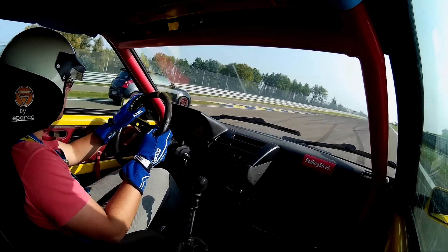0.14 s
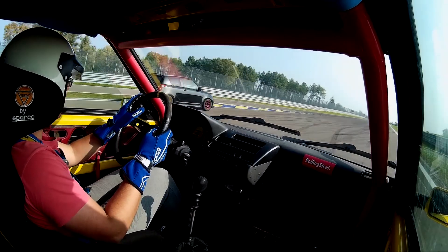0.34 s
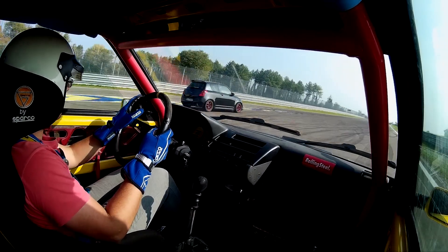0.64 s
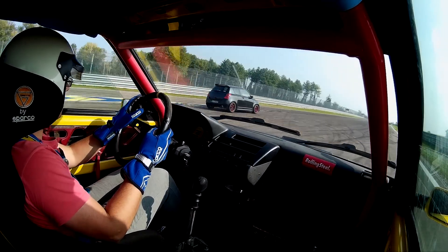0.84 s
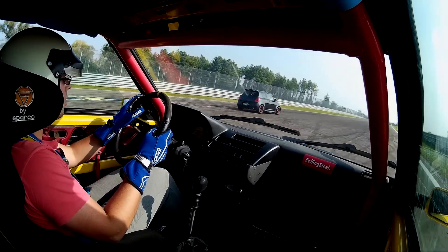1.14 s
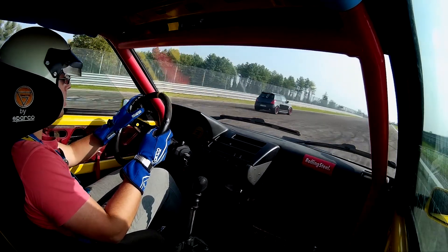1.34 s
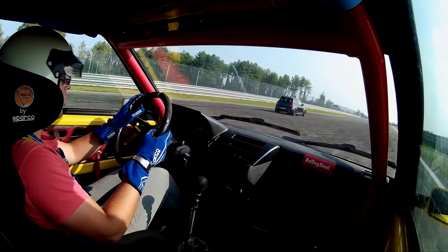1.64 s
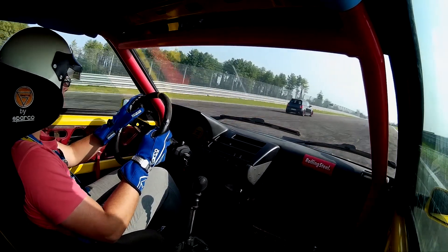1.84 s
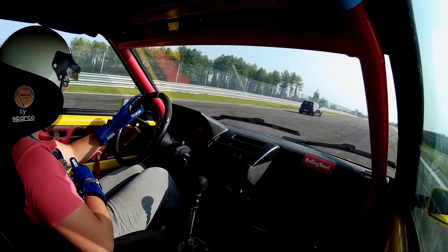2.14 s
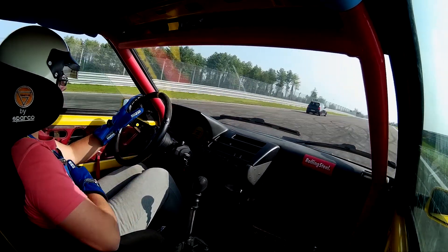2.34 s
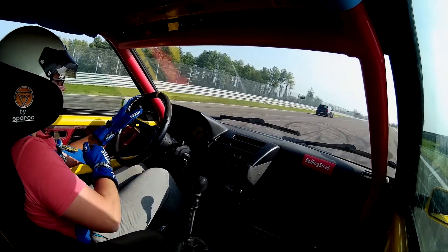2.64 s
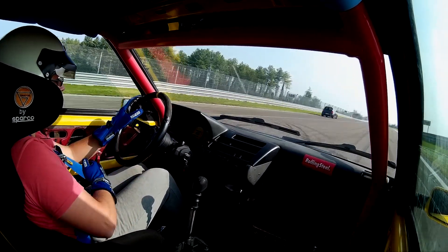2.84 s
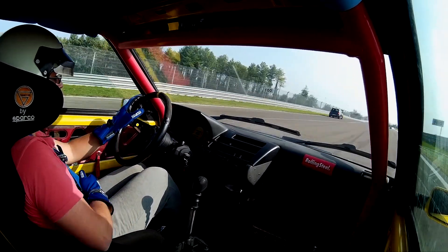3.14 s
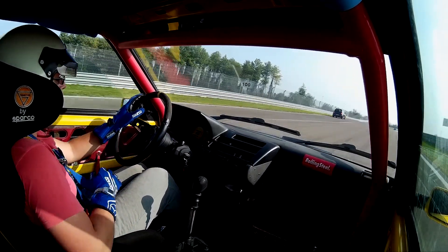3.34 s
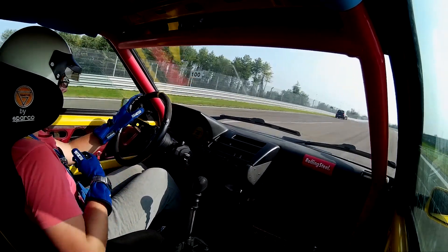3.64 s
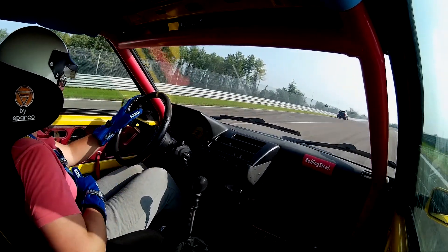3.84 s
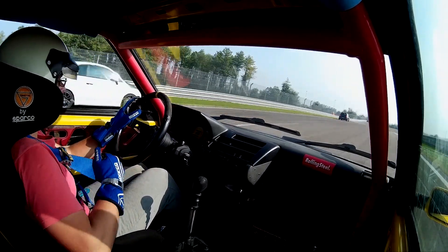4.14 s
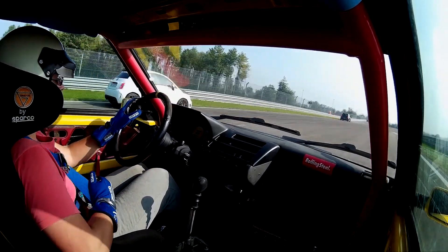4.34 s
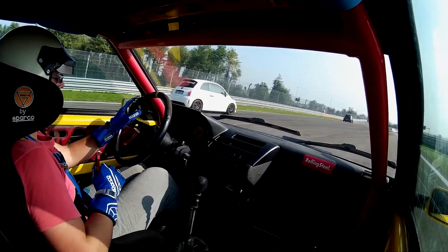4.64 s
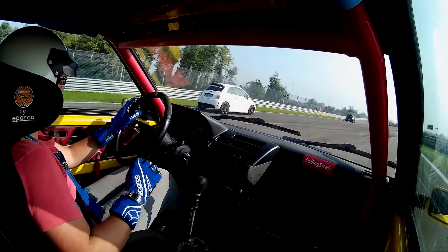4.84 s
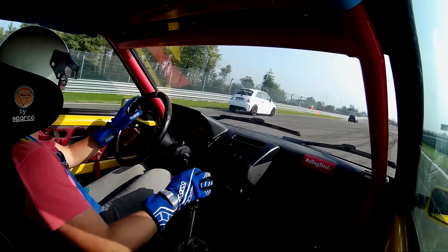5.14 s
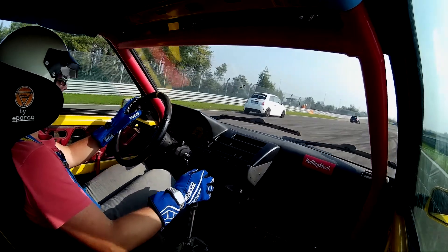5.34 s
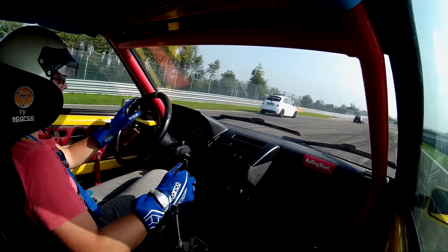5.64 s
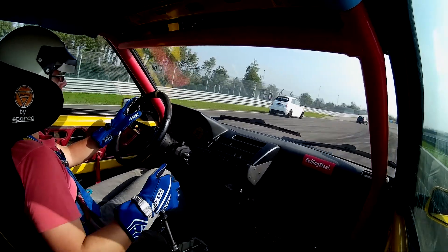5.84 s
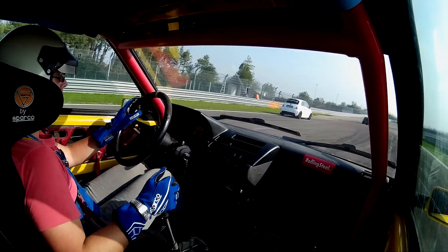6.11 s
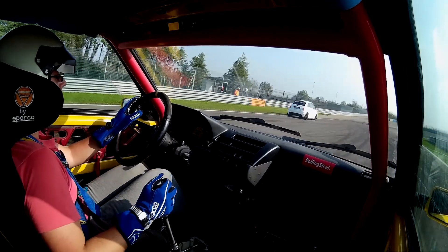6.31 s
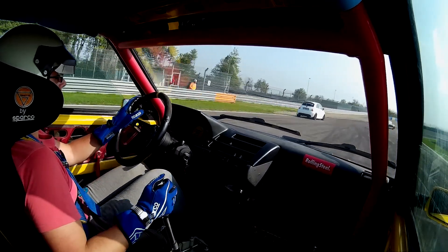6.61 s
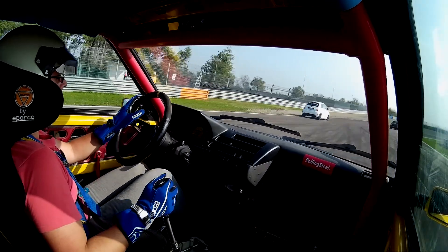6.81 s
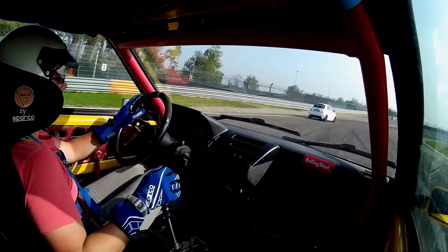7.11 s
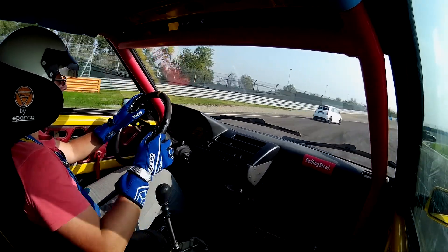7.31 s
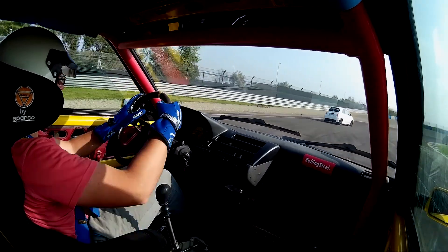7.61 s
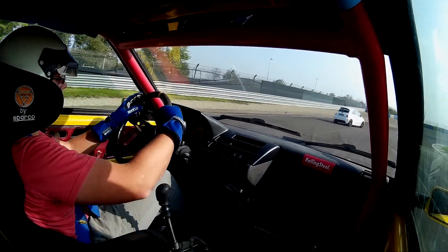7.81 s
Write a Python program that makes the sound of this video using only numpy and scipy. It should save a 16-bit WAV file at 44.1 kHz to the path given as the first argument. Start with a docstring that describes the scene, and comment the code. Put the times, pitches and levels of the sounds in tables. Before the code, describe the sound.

Close inside a bare metal race car cabin, a four-cylinder engine booms low and slowly drops in pitch over tyre roar and shell rumble. A higher-pitched car ahead fades away; around four seconds another rushes by with falling pitch. Revs then sag with harsh rasp, metallic rattles and tiny brake chirps, before a throttle blip climbs sharply and settles into a throbbing boom.

```python
"""Downshift inside a stripped race car

A four-cylinder race car pulls, coasts, brakes and blips down a gear, while one car pulls away and a second overtakes.
The exhaust is a harmonic series weighted by the bare cabin's modes, with a rasp of gas noise pulsed by the firings.
Filtered noise gives the roar of tyres and shell, sinking as the car slows; a loose fitting is struck at the firings.
Brake chirps are decaying sines; the other cars are harmonic sums; those of the car pulling away fade independently."""
import sys
import numpy as np
from scipy import signal
from scipy.fft import rfft, irfft
from scipy.io import wavfile
from scipy.ndimage import uniform_filter1d

SR = 44100
rng = np.random.default_rng(int(sys.argv[2]) if len(sys.argv) > 2 else 0)


def log_audio(samples):
    """Write samples as a 16-bit WAV file to the path given in sys.argv[1]."""
    # one column per channel
    frames = np.atleast_2d(samples).T
    # limit to full scale, then quantise
    limited = np.clip(frames, -1, 1)
    pcm = np.round(limited * 32767).astype(np.int16)
    wavfile.write(sys.argv[1], SR, pcm)


N = 351536
T = np.arange(N) / SR  # time [s]

# engine speed, coasting and then through the downshift: (time [s], firing rate [1/s])
ENGINE_SPEED = [(0.0, 129.3), (1.75, 122.4), (3.39, 114.8), (4.09, 108.7), (5.25, 99.5), (5.5, 97.0),
                (5.57, 94.5), (6.03, 68.0), (6.17, 62.9), (6.74, 87.5), (6.85, 98.1), (6.94, 113.6),
                (7.01, 112.1), (7.14, 103.2), (7.25, 108.3), (7.34, 103.4), (7.97, 96.5)]
# upper harmonics of the exhaust: (multiple of the firing rate [1], relative level [dB])
EXHAUST_HARMONICS = [(3, 3), (4, -5.5), (5, -7.5), (6, -12.5), (7, -9), (8, -19), (9, -13.5), (10, -28.5),
                     (11, -22.5), (13, -18)]
# cabin's effect on the upper harmonics: (frequency [Hz], lift [dB])
CABIN_RESPONSE = [(190, 2), (295, -4), (345, 0.7), (400, -2.5), (510, 1.5), (620, -1), (760, 0.5), (880, 6),
                  (1300, -5.5)]
# low air modes of the cabin: (frequency [Hz], width [Hz], boom level [dB])
CABIN_MODES = [(64, 10, -26), (85.7, 5.8, -18), (101.2, 12, -17), (112.1, 12, -16.5), (127, 11.5, -9),
               (137, 25, -11.5), (166, 10, -16.5), (196, 19, -20.5), (238, 42, -19.5)]
# surges of engine load: (peak time [s], rise [s], fall [s],
#   lift of rasp [dB], lift of cabin roar [dB], lift of upper harmonics [dB])
LOAD_SURGES = [(.4, 1.6, 1.0, 11, 0, 4.5), (5.97, 0.78, 0.28, 22.5, 8.6, 4),
               (6.86, 0.46, 0.12, 20.5, 9, 4.5), (7.951, 0.14, .3, 11, 3.3, 1)]
# spectrum of the exhaust rasp: (frequency [Hz], relative density [dB per Hz])
RASP_SPECTRUM = [(120, -37), (280, 1), (450, -13), (900, -14), (1300, -23), (2000, -29.5), (3000, -42),
                 (4500, -51), (7000, -62.5), (15000, -70.5)]
# spectrum of the shell shaking: (frequency [Hz], relative density [dB per Hz])
SHELL_SPECTRUM = [(8, -16), (20, -2), (31, -1), (39, 2), (50, -1), (62, -4), (85, -11), (200, -40),
                  (800, -100)]
# spectrum of the droning floor pan: (frequency [Hz], relative density [dB per Hz])
FLOOR_SPECTRUM = [(50, -21), (90, -5.5), (130, 3), (200, -1.5), (270, -5), (370, -2), (600, -24.5),
                  (2000, -100)]
# spectrum of the roar: (frequency [Hz], relative density [dB per Hz])
ROAR_SPECTRUM = [(300, -31.5), (480, 0.5), (700, -8), (1000, -3.5), (1400, -12), (2000, -23), (2600, -30.5),
                 (3300, -39.5), (3950, -39), (4700, -44.5), (6700, -50.5), (8100, -50.5), (9500, -54),
                 (15000, -57)]
# rough patches of track that shake the shell: (time [s], half length [s], lift [dB])
ROUGH_PATCHES = [(.1, 0.17, 3.5), (1.699, .8, 3), (4.9, .45, 4.5), (6.62, 0.17, 6.5)]
# fits of rattling: (start [s], end [s], rise [s], relative force [dB])
RATTLE_FITS = [(0, .68, 0.018, -66.5), (5.206, 5.354, .08, -63), (5.349, 5.627, 0.012, -49),
               (5.685, 5.739, 0.017, -43.5), (5.745, 6.008, .11, -42), (6.604, 6.698, 0.013, -44),
               (7.68, 7.97, .12, -62.5)]
# single knocks of the fitting: (time [s], relative blow [dB])
FITTING_KNOCKS = [(.347, -26), (.51, -27), (.627, -29), (.669, -25), (1.177, -26), (3.225, -31),
                  (6.328, -32.5)]
# spectrum of the rattling fitting: (frequency [Hz], relative density [dB per Hz])
FITTING_SPECTRUM = [(300, -38), (800, -8), (1300, -1), (2100, -.3), (3300, -11), (3950, -6), (4450, -1.5),
                    (5200, -15), (7800, -20), (9800, -25), (11700, -25.5), (12600, -34), (15000, -39)]
# the car pulling away ahead: (time [s], firing rate [1/s], relative level [dB])
LEADER_COURSE = [(0, 202, -27), (.3, 202.8, -26), (.7, 204, -28), (1.2, 205.8, -30), (2, 208, -33),
                 (3, 212, -41), (3.6, 214, -60)]
# its harmonics: (multiple of the firing rate [1], relative level [dB])
LEADER_HARMONICS = [(1, -4), (2, 0.6), (3, -4.5), (4, -12.5), (5, -5.5), (6, -11.5), (7, -16), (8, -19),
                    (9, -22), (10, -28), (11, -31), (12, -32.5), (14, -36.5)]
# flares of the harmonic nearest a frequency: (time [s], frequency [Hz], lift [dB], half length [s])
LEADER_FLARES = [(.4, 406, 3, .3), (.3, 1420, 8, .13), (.73, 1225, 12, .15), (1.2, 1645, 9, .3),
                 (1.35, 617, 4, .25)]
# faint metallic whirrs, silent if the end precedes the start:
#   (start [s], end [s], frequency [Hz], width [Hz], level [dB])
METAL_WHIRRS = [(0.7, .9, 3000, 330, -65.5), (8.5, 8.2, 4560, 650, -64), (1.7, 3.7, 4020, 420, -68.5),
                (3.5, 5.21, 3790, 460, -63), (3.5, 5.8, 3060, 530, -64.5), (1.4, 3.7, 8100, 600, -79.5)]
# the overtaking car, its pitch dropping as it passes: (time [s], firing rate [1/s], relative level [dB])
PASSER_COURSE = [(3.3, 197, -46), (3.45, 196, -27), (4.25, 156, -25.5), (4.42, 138, -20.5),
                 (4.68, 145, -25.5), (5.3, 130, -34.5), (5.9, 130, -30), (6.5, 129.5, -22),
                 (6.78, 124, -26.5), (7.1, 130, -55)]
# its harmonics: (multiple of the firing rate [1], relative level [dB])
PASSER_HARMONICS = [(1, 0), (2, -16), (3, -23), (4, -24), (5, -32.5), (6, -25)]
# spectrum of its rush beside the window: (frequency [Hz], relative density [dB per Hz])
RUSH_SPECTRUM = [(100, -20), (300, -5.5), (700, -7.5), (1300, -12.5), (2200, -18), (3500, -32),
                 (8000, -50.5), (14000, -81.5)]
# swells of the drivetrain hum off the throttle: (time [s], half length [s], level [dB])
SHAFT_SWELLS = [(3.695, 0.12, -25.5), (4.255, 0.21, -22), (4.921, .27, -26.5)]
# brake chirps: (time [s], frequency [Hz], peak level [dB], rise [s], decay time constant [s])
BRAKE_CHIRPS = [(5.591, 9500, -45, .008, .012), (5.977, 7714, -35.5, 0.0045, 0.02),
                (6.001, 7720, -42, 0.011, 0.021), (6.03, 7760, -41, 0.019, .012),
                (6.047, 6578, -45, .02, .014), (6.995, 6400, -58, .008, 0.0088)]
# spectrum of the engine block's ring: (frequency [Hz], relative density [dB per Hz])
BLOCK_SPECTRUM = [(400, -34.5), (1400, 9), (2500, 4), (3300, -11.5), (5000, -22), (9000, -35.5),
                  (15000, -45.5)]

SECOND_DB = -5.5  # offset of the second harmonic's boom
UPPER_DB, UPPER_DB_PER_S = -35.5, 0.87  # the upper harmonics come forward with time
SURGE_CURVE = .85  # under 1: the load comes in early and holds
BITE_S, BITE_LENGTH_S, BITE_DB = 6.9, 0.038, 7.5  # the clutch bites in the lower gear and the boom jumps
THROB_HZ, THROB_DB, THROB_CREST_S = 9, 2.5, 7.43  # the boom also throbs steadily from then on
RASP_DB = -48  # off the throttle
DRONE_DB, ROAR_DB, ROAR_DB_PER_S = -26, -32, -0.66  # drone and roar sink as the car slows
RUMBLE_DB, RUMBLE_DB_PER_S = -25, -1.03  # and so does the shaking of the shell
RATTLE_RELEASE_S = 0.0087  # time constant
BUZZ_DB = -85.5  # relative force between fits, off the throttle
RAP_START_S, RAP_RISE_S, RAP_DB = 6.33, .07, -57  # combustion raps once the engine picks up again
LUG_S, LUG_LENGTH_S, LUG_DB = 6.58, 0.13, 13  # hardest while it pulls up from low revs
EDGE_HZ = 15900  # upper band limit


def gain_of(db):
    """Logarithmic level: decibels become an amplitude ratio."""
    return 10 ** (np.asarray(db) / 20)


def evened(x):
    """Power normalization: the signal is scaled to rms 1."""
    return x / np.sqrt(np.mean(x ** 2) + 1e-20)


def curves(rows):
    """Linear interpolation: every column of a table becomes a course in time."""
    s, *columns = np.transpose(rows)
    return [np.interp(T, s, column) for column in columns]


def swell(s, length):
    """Gaussian envelope: a bell of height 1 around the time s."""
    return np.exp(-((T - s) / length) ** 2)


def wander(hz, size=2048):
    """Low-passed random process: slow variation with changes up to about hz."""
    f = np.fft.rfftfreq(size, N / SR / size)
    spectrum = rfft(rng.standard_normal(size)) / (1 + (f / hz) ** 4)
    slow = evened(irfft(spectrum, size))
    return np.interp(T, np.linspace(0, T[-1], size), slow)


def colour(x, points, size=8192):
    """Minimum-phase filtering: the Hilbert transform of the log gain sets a causal phase."""
    f, db = np.transpose(points)
    hz = abs(np.fft.fftfreq(size, 1 / SR))
    level_db = np.interp(np.log(hz + 1), np.log(f + 1), db)
    log_gain = np.log(gain_of(np.maximum(level_db, -100)))
    response = np.exp(np.conj(signal.hilbert(log_gain)))
    taps = np.fft.ifft(response).real[:size // 2]
    return signal.oaconvolve(x, taps / np.linalg.norm(taps))[:N]


def hiss(points):
    """Spectral shaping: white noise is filtered to a given spectrum at rms 1."""
    return evened(colour(rng.standard_normal(N), points))


def tone(turns):
    """Phase accumulation: a sine of rms 1 follows a count of cycles from a random phase."""
    phase = 2 * np.pi * (turns + rng.random())
    return np.sqrt(2) * np.sin(phase.astype(np.float32))


def surges():
    """Engine loading: load builds and lets go, lifting rasp, cabin roar and upper harmonics in dB."""
    lifts_db = np.zeros((3, N))
    for s, rise, fall, *db in LOAD_SURGES:
        load = np.clip(np.minimum(1 + (T - s) / rise, 1 - (T - s) / fall), 0, 1)
        lifts_db += np.outer(db, load ** SURGE_CURVE)
    return lifts_db


def boom(hz):
    """Modal resonance: a harmonic's level in dB follows from the cabin modes near its frequency."""
    power = 0
    for f, width, db in CABIN_MODES:
        power = power + (gain_of(db) / (1 + (2 * (hz - f) / width) ** 2)) ** 2
    return 10 * np.log10(power)


def boom_lift():
    """Amplitude modulation: the boom jumps as the clutch bites, and from then on it also throbs at a steady
    rate; lift in dB."""
    throb = np.cos(2 * np.pi * THROB_HZ * (T - THROB_CREST_S))
    throb *= np.clip((T - BITE_S) / 0.24, 0, 1)
    return BITE_DB * swell(BITE_S, BITE_LENGTH_S) + THROB_DB * throb


def exhaust(turns, hz, boom_db, second_db, upper_db, shake=0.039, flutter=0.25, uneven_db=-22):
    """Harmonic series: firings excite cabin resonances; unequal cylinders add weak lines between harmonics."""
    low = gain_of(boom_db) * tone(turns) * (1 + shake * wander(24))
    low += gain_of(second_db) * tone(2 * turns) * (1 + .15 * wander(19))
    f, lift_db = np.transpose(CABIN_RESPONSE)
    upper = np.zeros(N)
    for k, db in EXHAUST_HARMONICS:
        level = gain_of(db + np.interp(k * hz, f, lift_db))
        upper += level * tone(k * turns) * (1 + flutter * wander(9))
    between = np.zeros(N)
    for k in range(5, 38):
        if k % 4:  # quarters of the firing rate that are not whole multiples
            between += tone(k * turns / 4) * (1 + .5 * wander(6)) / np.sqrt(k / 8)
    return low + gain_of(upper_db) * evened(upper + gain_of(uneven_db) * between)


def rasp(turns, lift_db, puff=0.98, front=0.033, pulse_db=-3):
    """Pulsed turbulence: every firing sends a steep pressure front and a puff of gas down the pipe."""
    cycle = turns % 1  # puff and front are decay constants in firing periods
    pulse = np.diff(np.exp(-cycle / front), prepend=0) * (1 + 0.22 * wander(60))
    gas = (0.09 + np.exp(-cycle / puff)) * rng.standard_normal(N)
    drive = evened(gas) + gain_of(pulse_db) * evened(pulse)
    return gain_of(RASP_DB + lift_db) * evened(colour(drive, RASP_SPECTRUM))


def road(lift_db, grain_db=1.2, bumps_db=1.3):
    """Random excitation: bumps shake the shell; tyres and shell drone and roar through the bare floor,
    louder when the engine labours."""
    patches_db = sum(db * swell(s, length) for s, length, db in ROUGH_PATCHES)
    rumble_db = RUMBLE_DB + RUMBLE_DB_PER_S * T + patches_db + bumps_db * wander(7)
    roar_lift_db = ROAR_DB_PER_S * T + lift_db
    rumble = hiss(SHELL_SPECTRUM) * gain_of(rumble_db)
    drone = hiss(FLOOR_SPECTRUM) * gain_of(DRONE_DB + roar_lift_db)
    roar = hiss(ROAR_SPECTRUM) * gain_of(ROAR_DB + roar_lift_db + grain_db * wander(36))
    return rumble + drone + roar


def shaking(lift_db):
    """Forced vibration: the fitting has a faint buzz rising with the rasp, and fits that build and stop quickly."""
    force = gain_of(BUZZ_DB + lift_db)
    for start, end, rise, db in RATTLE_FITS:
        onset = np.clip((T - start) / rise, 0, 1)
        release = np.exp(-np.maximum(T - end, 0) / RATTLE_RELEASE_S)
        force = force + gain_of(db) * onset * release
    return force


def contacts(blows, count=12):
    """Impact response: each blow lands on one of a few spots, each with its own short ring."""
    spot = rng.integers(0, count, N)
    rings = rng.standard_normal((count, 256)) * np.exp(-T[:256] / .0005)
    out = np.zeros(N)
    for k, ring in enumerate(rings):
        out += signal.oaconvolve(blows * (spot == k), ring / np.linalg.norm(ring))[:N]
    return out


def cabin(x):
    """Exponential reverberation: bare metal and glass return a short patter of reflections."""
    t60, wet_db = .022, -9  # decay by 60 dB [s], reflections against the direct sound [dB]
    t = T[:SR // 8]
    response = rng.standard_normal(len(t)) * gain_of(-60 * t / t60)
    response *= gain_of(wet_db) / np.linalg.norm(response)
    response[0] = 1
    return signal.oaconvolve(x, response)[:N]


def rattle(turns, force, scatter_db=3.5, slop=.025, rattle_db=7.5, bounce_db=-46):
    """Repeated impact: each firing throws the fitting against its seat; shaken hard, it bounces twice more."""
    loose = np.minimum(force / gain_of(bounce_db), 1)
    clicks = np.zeros(N)
    firings = np.arange(int(turns[-1]))
    for lag, db in [(0, 0.5), (.47, -2), (.7, -2.5)]:  # lag in firing periods, as is slop
        late, size = rng.standard_normal((len(firings), 2)).T
        at = np.searchsorted(turns, firings + lag + slop * late).clip(0, N - 1)
        spread_db = scatter_db * size.clip(-2, 1.3) * loose[at]
        clicks[at] += gain_of(db + spread_db) * (loose[at] if lag else 1)
    # the force is shared among the bounces of a few firings
    density = abs(uniform_filter1d(clicks ** 2, size=SR // 25))
    blows = clicks / np.sqrt(density + 1e-6) * force * gain_of(rattle_db)
    for s, db in FITTING_KNOCKS:
        blows[round(s * SR)] += gain_of(db)
    return colour(cabin(contacts(blows)), FITTING_SPECTRUM)


def other_car(rows, note, flares, fading_db=1.8, waver=.001, dulling_db=0):
    """Harmonic summation: reflections may fade each harmonic on its own, and distance may dull the high ones."""
    hz, level_db = curves(rows)
    turns = np.cumsum(hz * (1 + waver * wander(20))) / SR
    out = np.zeros(N)
    for k, db in note:
        flare_db = 0
        for s, f, lift, length in flares:
            if round(f / rows[0][1]) == k:
                flare_db = flare_db + lift * swell(s, length)
        harmonic_db = level_db + db + flare_db + fading_db * wander(9.4) - dulling_db * k * T
        out += gain_of(harmonic_db) * tone(k * turns)
    return out * ((T >= rows[0][0]) & (T <= rows[-1][0]))


def whirr(turns):
    """Narrow-band resonance: engine vibration sets thin metal parts whirring."""
    out = np.zeros(N)
    for start, end, hz, width, db in METAL_WHIRRS:
        ticks = (0.74 + np.exp(-(turns % 1) / 0.37)) * rng.standard_normal(N)
        peak = signal.iirpeak(hz, hz / width, fs=SR)
        ring = signal.lfilter(*peak, signal.lfilter(*peak, ticks))
        fade = np.clip(np.minimum(T - start, end - T) / .2, 0, 1)
        out += gain_of(db + 2 * wander(18)) * fade * evened(ring)
    return out


def whoosh(s=4.35, length=0.16, db=-37, lag=.3, wake_length=0.5, wake_db=-36.5):
    """Broadband flow noise: the overtaking car rushes beside the window, then its tyres sound as it draws ahead."""
    rush = gain_of(db) * swell(s, length) * hiss(RUSH_SPECTRUM)
    wake = gain_of(wake_db) * swell(s + lag, wake_length) * hiss(ROAR_SPECTRUM)
    return rush + wake


def drivetrain(turns):
    """Geared rotation: a shaft at a fixed ratio to the firing rate hums in swells while the car coasts."""
    ratio = 2.22
    level = sum(gain_of(db) * swell(s, length) for s, length, db in SHAFT_SWELLS)
    return level * tone(ratio * turns) * (1 + 0.14 * wander(12.0))


def brakes():
    """Friction-excited vibration: a pad catches a mode of the disc, which swells and dies."""
    out = np.zeros(N)
    for s, hz, db, rise, decay in BRAKE_CHIRPS:
        onset = np.clip((T - s) / rise, 0, 1) ** 2
        dying = np.exp(-np.maximum(T - s - rise, 0) / decay)
        out += gain_of(db) * onset * dying * np.sin(2 * np.pi * hz * T)
    return out


def combustion(turns):
    """Impulse excitation: from the moment the engine picks up again, each firing raps the block once."""
    raps = np.diff(np.floor(turns), prepend=0) * gain_of(wander(60))
    onset = np.clip((T - RAP_START_S) / RAP_RISE_S, 0, 1)
    level = onset * gain_of(RAP_DB + LUG_DB * swell(LUG_S, LUG_LENGTH_S))
    return evened(colour(cabin(raps), BLOCK_SPECTRUM)) * level


def scene():
    """Superposition: the pressures of all sources add in the cabin."""
    firing_hz, = curves(ENGINE_SPEED)
    rasp_db, roar_db, upper_lift_db = surges()
    turns = np.cumsum(firing_hz * (1 + .002 * wander(28))) / SR  # count of firings
    boom_db = boom(firing_hz) + boom_lift()
    second_db = boom(2 * firing_hz) + SECOND_DB
    upper_db = UPPER_DB + UPPER_DB_PER_S * T + upper_lift_db
    engine = exhaust(turns, firing_hz, boom_db, second_db, upper_db) + rasp(turns, rasp_db)
    engine += drivetrain(turns) + combustion(turns)
    metal = rattle(turns, shaking(rasp_db)) + whirr(turns) + brakes()
    leader = gain_of(-4) * other_car(LEADER_COURSE, LEADER_HARMONICS, LEADER_FLARES, dulling_db=0.28)
    passer = gain_of(1.5) * other_car(PASSER_COURSE, PASSER_HARMONICS, [], fading_db=0.0, waver=.006)
    return (engine + metal + road(roar_db) + leader + passer + whoosh())[None]


def record(dry, ceiling=.72):
    """Soft saturation and band limiting: the loudest peaks are rounded off, then the top band is cut."""
    held = dry / (1 + (dry / ceiling) ** 16) ** (1 / 16)
    low_pass = signal.firwin(511, EDGE_HZ, window=("kaiser", 9), fs=SR)
    return signal.oaconvolve(held, low_pass[None], "same")


dry = scene()
out = record(dry)
log_audio(out)
```